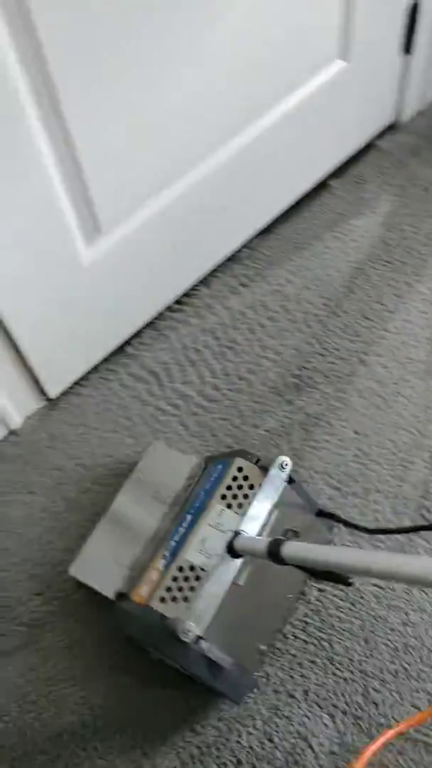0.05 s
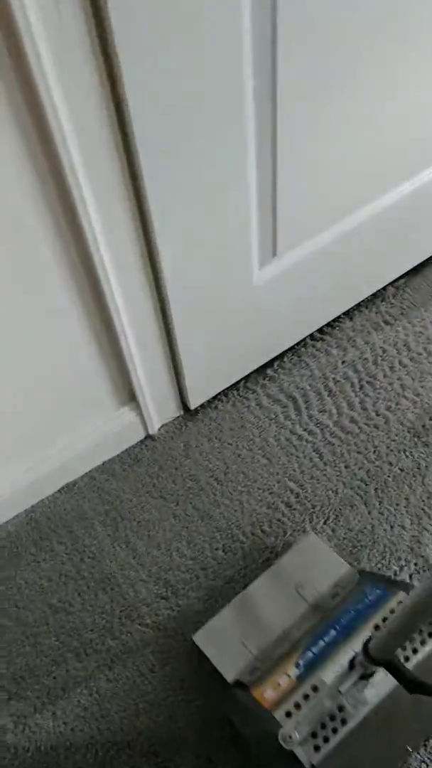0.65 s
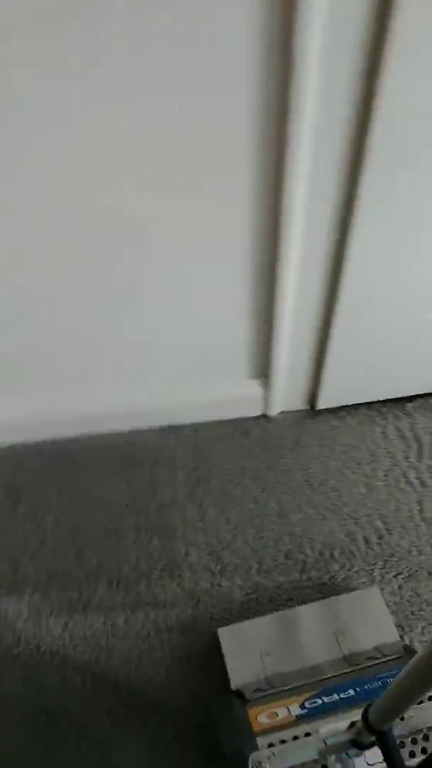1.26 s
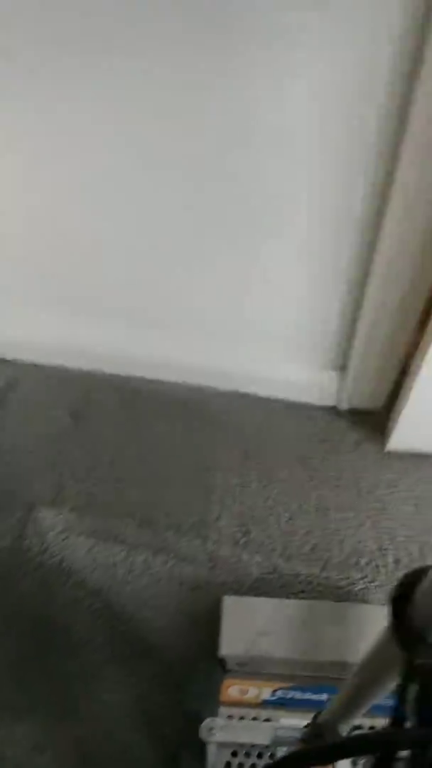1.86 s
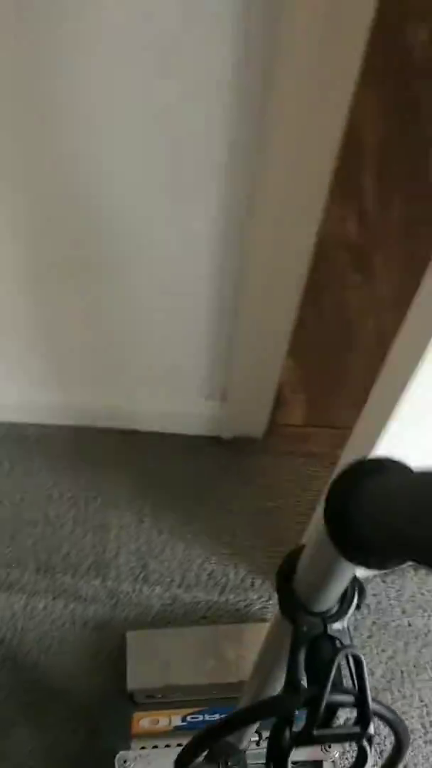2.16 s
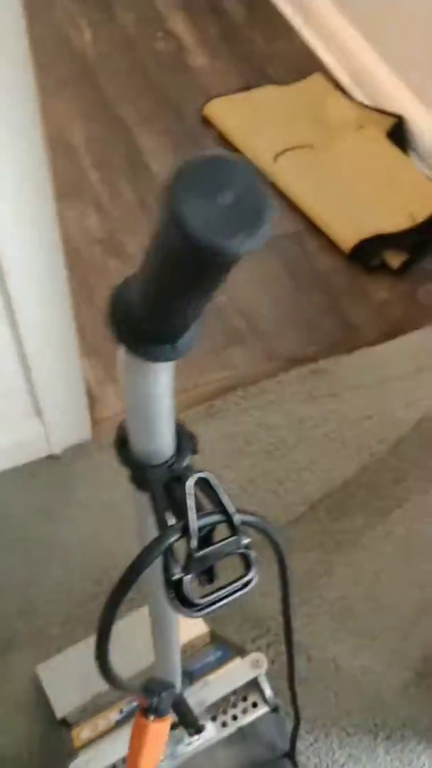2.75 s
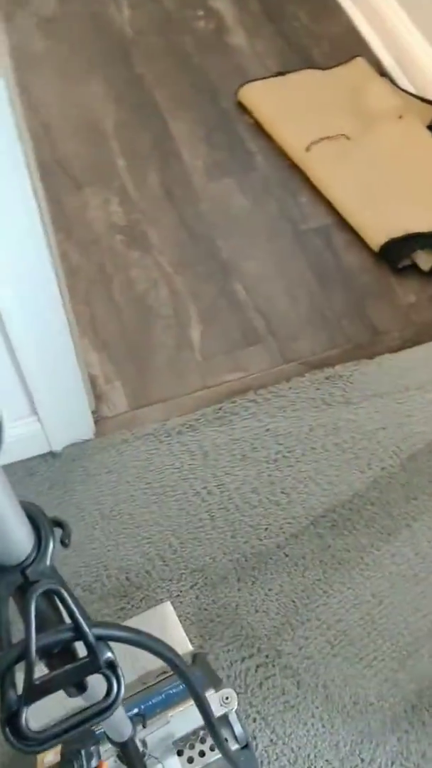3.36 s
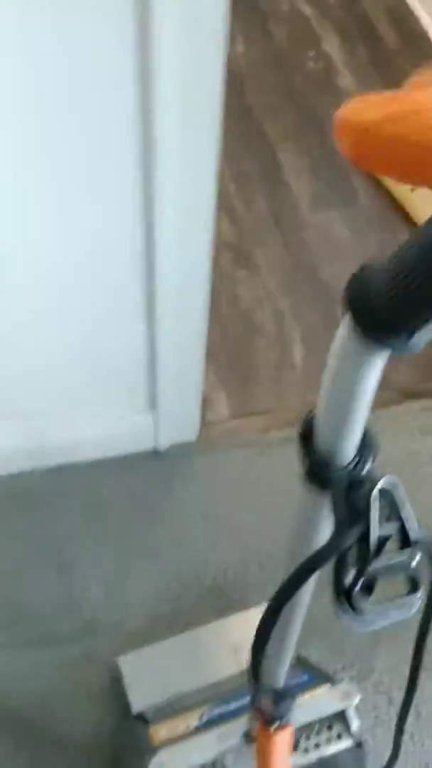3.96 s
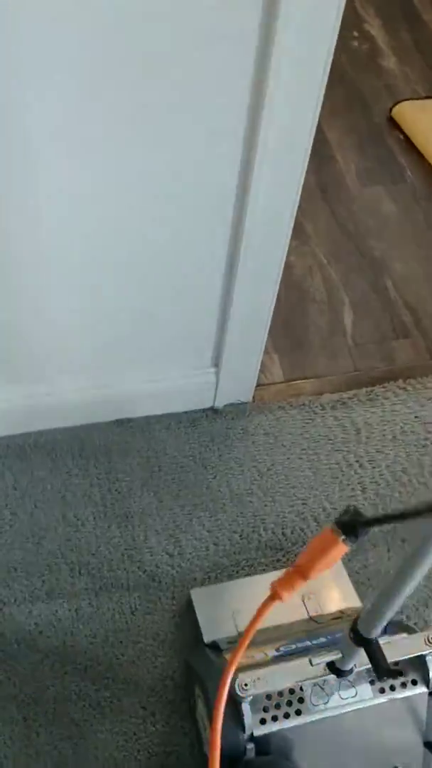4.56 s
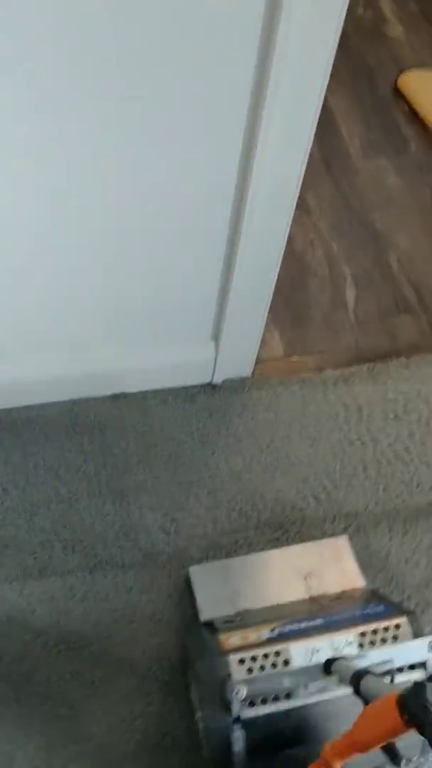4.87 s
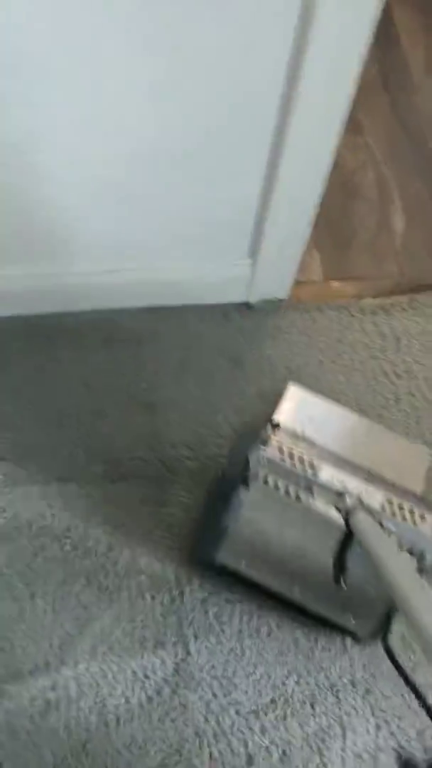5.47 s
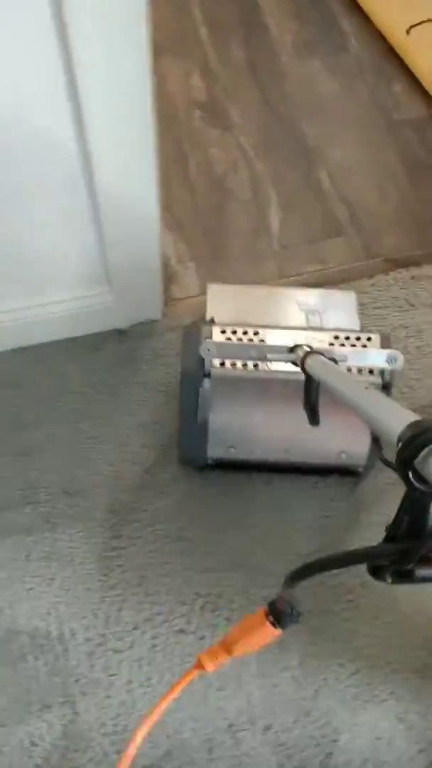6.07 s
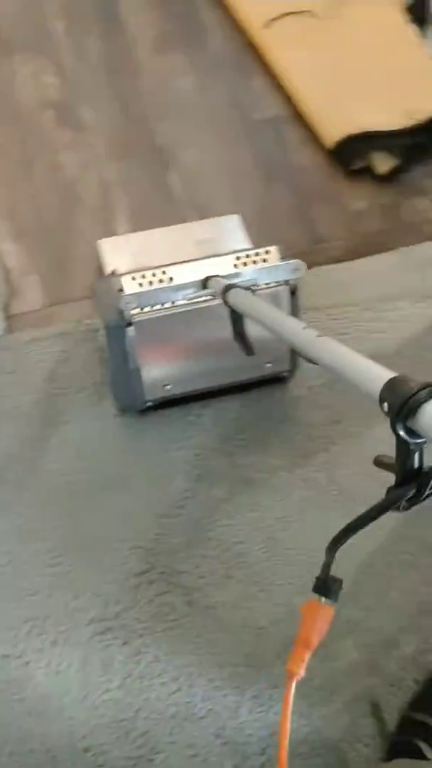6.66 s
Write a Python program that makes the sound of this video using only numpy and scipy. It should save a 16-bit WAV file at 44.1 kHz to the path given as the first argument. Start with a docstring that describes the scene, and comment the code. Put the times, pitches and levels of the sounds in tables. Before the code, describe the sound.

A carpet brush machine runs loudly, with a rattling motor drone and hissing bristles. Within a second it switches off and its handle latches upright with a metallic ring. It rolls softly over carpet, with faint wheel squeaks, light knocks and a clinking cord hook. A hand bumps the close microphone, a catch snaps open, and the motor spins up again in the quiet hallway.

```python
"""A carpet brush machine runs in a hallway: gear impacts and flicking bristles excite its metal housing.
It is switched off, friction stops the brushes, and the handle latches upright with a ring.
It is wheeled softly over the pile; a wheel squeaks, the handle tube knocks and the cord hook clinks.
Cord and glove rub the handle, a hand brushes the pair of microphones, and the catch snaps open.
Last, the switch clicks and the motor spins up again. A faint room tone lies under it all."""
import sys
import numpy as np
from scipy import signal
from scipy.fft import rfft, irfft, next_fast_len
from scipy.io import wavfile

SR = 44100
rng = np.random.default_rng(int(sys.argv[2]) if len(sys.argv) > 2 else 0)


def wav_record(signal):
    """Record a signal, one row per channel, as 16-bit PCM in the file named by sys.argv[1]."""
    frames = np.transpose(np.atleast_2d(signal))
    bounded = np.clip(frames, -1, 1)
    # unit amplitude maps onto the largest positive 16-bit level
    quanta = np.round(bounded * 32767).astype(np.int16)
    wavfile.write(sys.argv[1], SR, quanta)


N = 296352
TIME = np.arange(N) / SR
FFT_SIZE = next_fast_len(N + SR // 2)
HZ = np.maximum(np.arange(FFT_SIZE // 2 + 1) * SR / FFT_SIZE, 1)


def motor(shaft_hz=40.25, teeth=13, wander=.004, sag_per_db=.012, sag_below_db=-27):
    """Rotating machinery: one shaft times gears, bristles and drone, and turns slower at weak drive."""
    gear_db, bristle_db = run_levels()
    speed = 1 - sag_per_db * np.clip(sag_below_db - gear_db, 0, 40) + wander * drift(14)
    turns = np.cumsum(shaft_hz * speed) / SR
    rattle = gear_rattle(teeth * turns)
    hiss = bristle_hiss(turns / shaft_hz)
    tones = winding_hum() + shaft_drone(turns, teeth)
    return from_db(gear_db) * (rattle + tones) + from_db(bristle_db) * hiss


# motor runs: on t/s, off t/s, gear base level/dB, bristle base level/dB
RUNS = [(-0.2, 0.73, -21, -31), (5.111, 7.0, -22, -33)]
def run_levels(bite_db=3, bite_s=.09, swell_db_per_s=3, spin_up_s=.11, hiss_exponent=1.7):
    """Noise follows load: the brushes grab the pile, settle, then dig in. Gear and bristle levels in dB."""
    gears = bristles = 1e-6
    for on_s, off_s, gear_db, bristle_db in RUNS:
        effort = drive(on_s, off_s, spin_up_s)
        running_s = np.clip(TIME, on_s, off_s) - on_s
        surge_db = bite_db * np.exp(-np.maximum(0, running_s - spin_up_s) / bite_s)
        swell_db = swell_db_per_s * running_s
        gears = gears + effort * from_db(gear_db + surge_db + swell_db)
        bristles = bristles + effort ** hiss_exponent * from_db(bristle_db + swell_db)
    return 20 * np.log10([gears, bristles])


def drive(on_s, off_s, spin_up_s, brake_s=.05, coast_s=.19, coast_share=.36):
    """Inertia and friction: the brushes spin up, hold, are braked by the pile and coast out (0-1)."""
    since_off = np.maximum(0, TIME - off_s)
    rising = np.clip((TIME - on_s) / spin_up_s, 0, 1) ** 1.8
    braking = (1 - coast_share) * np.exp(-since_off / brake_s)
    coasting = coast_share * np.exp(-since_off / coast_s)
    return rising * (braking + coasting)


# gear noise spectrum: f/Hz, level/dB
RATTLE_SPECTRUM = [(30, -28), (80, -14.5), (170, -10.5), (235, -7.5), (290, -1), (500, -0.5), (650, -1),
                   (850, 0), (1100, -1), (1600, -0.5), (1900, -4.5), (2250, -23), (3500, -14.5),
                   (5000, -23.5), (9000, -25.5)]
def gear_rattle(teeth_passed, tooth_gain=.36, level_db=-3):
    """Impact excitation: each meshing tooth strikes with uneven force among random small contacts."""
    strikes = np.diff(np.floor(teeth_passed), prepend=0) * white()
    contacts = tooth_gain * unit_rms(strikes) + grains(per_s=4500, spread_db=.4)
    return from_db(level_db) * housing(coloured(contacts, RATTLE_SPECTRUM))


# bristle noise spectrum: f/Hz, level/dB
HISS_SPECTRUM = [(1200, -56), (2400, -3.5), (3300, 0.5), (3900, 3), (4250, -2.5), (5100, -4.5), (5900, -3),
                 (6400, -9.5), (8200, -9.5), (8900, -9), (10500, -11.5), (13000, -13.5), (16000, -17)]
def bristle_hiss(shaft_time_s, rows_hz=58, level_db=-.8):
    """Shot noise: countless flicks merge into a hiss, weakly modulated as each row meets the pile."""
    rows_db = .5 * np.sin(2 * np.pi * rows_hz * shaft_time_s) + .4 * drift(220)
    flicks = coloured(grains(per_s=22000, spread_db=1), HISS_SPECTRUM)
    return from_db(level_db + rows_db) * housing(flicks)


# the machine's four places (by the door, at the wall, turning, in the doorway): t/s
PLACE_TIMES = [1.0, 5.45, 5.9, 6.45]
# housing modes: f/Hz, bandwidth/Hz, level/dB at each place
HOUSING_MODES = [(272, 21, 4.5, -1, 8, 1), (334.6, 25, 4.5, 7.5, 6, 2), (448, 25, 6.5, -2, 11, 0.5),
                 (496, 15, 8, 4, 11, -6), (561.5, 22, 6, 3, 10, 1), (735, 51, 0.5, 5.5, 7.5, 5),
                 (790, 21, 2.5, 4, 8, 9), (858, 27, 6, 1, 1, 1), (941, 67, 5, 2, 7, 7),
                 (1066, 57, -3.5, -3, 11.5, -2), (1330, 99, 2, -6, 7, 4.5), (1520, 230, -2, 2.5, -2, 2),
                 (2010, 150, 1, 4, 7.5, -4), (2620, 240, 4, 4.5, 11, 4.5), (3836, 130, 1.5, 1, 11.5, -10)]
def housing(x, ripple_db=2.5, ripple_hz=19):
    """Resonance and interference: modes lift the spectrum and near walls ripple it, place by place."""
    out = 0
    for k, here in enumerate(np.eye(len(PLACE_TIMES))):
        lift_db = sum(db[k] * resonance(hz, width) for hz, width, *db in HOUSING_MODES)
        ripple = np.interp(HZ / ripple_hz, np.arange(2000), rng.standard_normal(2000))
        crossfade = np.sqrt(np.interp(TIME, PLACE_TIMES, here))
        out = out + crossfade * unit_rms(filtered(x, from_db(lift_db + ripple_db * ripple)))
    return out


# shaft harmonics: multiple of the turning rate, relative level/dB at each place
SHAFT_ORDERS = [(7, -24, -24, -22, -17), (8, -25, -18, -17, -22), (11, -19, -23, -15, -17),
                (13, -13, -6.5, -5, -10.5), (14, -11, -18, -17, -16), (19, -23, -16, -17, -12),
                (20, -17, -15, -19, -15), (23, -15, -26, -25, -24), (32, -22, -23, -21, -17),
                (34, -20, -19, -18, -17)]
def shaft_drone(turns, teeth, flutter_db=3.2):
    """Harmonics of rotation: the lines churn with the load; the tooth rate is steadiest in phase."""
    out = 0
    for order, *db in SHAFT_ORDERS:
        level_db = np.interp(TIME, PLACE_TIMES, db) + flutter_db * drift(20)
        slip_rad = (.45 if order == teeth else .9) * drift(32)
        out = out + from_db(level_db) * np.sin(2 * np.pi * order * turns + slip_rad)
    return out


# hum of the windings: relative level/dB at each place
WINDING_LEVELS = [-21.5, -27.5, -28, -28]
def winding_hum(mains_hz=59.8):
    """Magnetic force peaks twice a cycle, so the windings hum at double the mains frequency."""
    tone = np.sin(4 * np.pi * mains_hz * TIME + .35 * drift(40))
    level_db = np.interp(TIME, PLACE_TIMES, WINDING_LEVELS) + 2.2 * drift(35)
    return from_db(level_db) * tone


# knocks on the handle tube: t/s, level/dB, tilt/(dB/octave), T60/s, spot f/Hz, spot level/dB
KNOCKS = [(0.913, -44, -7, 0.12, 800, -37), (1.309, -45, -9, 0.02, 1100, -45),
          (1.678, -47, 0, 0.08, 3450, -40), (1.724, -38.5, -3.5, 0.095, 1600, -39),
          (1.77, -40, -1.8, 0.12, 3300, -39), (2.853, -30, -1, 0.16, 800, -33),
          (2.966, -43, -6, 0.15, 1050, -35), (3.997, -44, -5, 0.04, 1340, -32),
          (4.041, -41, -4, .05, 1420, -29), (4.155, -42, -10.5, 0.08, 600, -27),
          (4.297, -33, -7, 0.05, 445, -23), (4.322, -47, -9, 0.05, 1320, -33),
          (4.473, -40, -0.5, 0.05, 3300, -33), (4.848, -22.5, -2, 0.03, 1550, -15.5),
          (4.94, -32.5, 2.5, 0.06, 1300, -30), (5.135, -31, -3, 0.05, 800, -29)]
# clicks of switch, latch and fittings: t/s, level/dB, tilt/(dB/octave), T60/s
CLICKS = [(0.721, -43, 5.5, 0.092), (0.999, -37.5, -4, 0.06), (1.016, -29.5, 7, 0.017),
          (1.022, -29.5, 4.5, 0.055), (2.72, -46, -3.5, 0.11), (3.05, -51, -2.5, 0.21),
          (3.475, -51, -3, 0.3), (3.979, -40, -1.5, 0.056), (4.053, -42.5, -3, 0.02),
          (4.484, -41, -3, 0.03), (4.503, -41, 0, 0.084), (4.758, -43.5, 4, 0.11), (4.951, -33, -2, 0.036),
          (5.113, -37.5, 0, 0.13)]
# thud, clack, snap and tick bands: lower f/Hz, upper f/Hz
IMPACT_BANDS = [(250, 650), (750, 1950), (2000, 6000), (6000, 15000)]
# response of each band: knock gain/dB, click gain/dB, factor on T60
BAND_RESPONSE = [(-10, -1, 0.64), (4, 2, 0.94), (3, 1.5, 1.21), (-4.5, 2.5, 1.12)]
def impacts(pivot_hz=2000):
    """Modal overlap: a blow excites modes of plastic and tube so dense that they decay as noise bands."""
    out = 0
    for (low, high), (knock_db, click_db, t60_factor) in zip(IMPACT_BANDS, BAND_RESPONSE):
        octaves = np.log2(np.sqrt(low * high) / pivot_hz)
        envelope = 0
        for rows, band_db in (KNOCKS, knock_db), (CLICKS, click_db):
            s, db, tilt, t60 = with_rebounds(rows)
            envelope = np.hypot(envelope, blows(s, db + band_db + tilt * octaves, t60 * t60_factor))
        band = signal.butter(4, [low, high], "band", fs=SR, output="sos")
        chatter = grains(per_s=14000, spread_db=1.5) * envelope
        out = out + signal.sosfilt(band, chatter) * np.sqrt(SR / 2 / (high - low))
    return out


def struck_spots(t60_s=.12):
    """Local resonance: each knock sounds the hollow note of the spot that it strikes."""
    return sum(ringing([(hz, 0, t60_s)], [(s, db)], split=.03) for s, *_, hz, db in KNOCKS)


def softness_db(db, hard_blow_db=-30.5):
    """Nonlinear contact: crack and rebound weaken by as much as a blow falls short of a hard one."""
    return max(0, hard_blow_db - db)


def with_rebounds(rows, delay_s=.0092, loss_db=4.5):
    """Restitution: each blow makes a second, weaker contact. Returns the columns of both."""
    first = [row[:4] for row in rows]
    again = [(s + delay_s, db - loss_db - softness_db(db), tilt, t60) for s, db, tilt, t60 in first]
    return np.transpose(first + again)


def blows(times, levels_db, t60s, rise_s=.0005, crack_t60_s=.0059):
    """Incoherent sum: the opening cracks and decaying chatter of blows add in power to one envelope."""
    power = np.zeros(N)
    for s, db, t60 in zip(times, levels_db, t60s):
        start = int(s * SR)
        age = TIME[:min(SR // 2, N - start)]
        chatter = from_db(db - 60 * age / t60) ** 2 * (1 - np.exp(-age / rise_s))
        crack = from_db(db - softness_db(db) - 60 * age / crack_t60_s) ** 2
        power[start:start + len(age)] += chatter + crack
    return np.sqrt(power)


# modes of the handle tube and its fittings: f/Hz, bandwidth/Hz, added gain
TUBE_MODES = [(470, 45, 0.48), (1134, 60, 0.65), (1480, 87, 0.28)]
def tube(x):
    """Forced resonance: the hollow tube adds its short-lived modes to every impact."""
    peaks = sum(gain * signal.lfilter(*signal.iirpeak(hz, hz / width, fs=SR), x)
                for hz, width, gain in TUBE_MODES)
    return x + peaks


# modes of latch, metal cord hook and catch: f/Hz, level/dB, T60/s
LATCH_MODES, HOOK_MODES, CATCH_MODES = [(479, -27, .5), (1186, -18, .22), (1235, -1.5, .048),
                                        (1265, -13.5, .46), (1334, -25, .38), (3171, -35, .43),
                                        (3327, -33, .3), (4270, -8, .06), (5190, -23, .28),
                                        (6250, -10, .06), (6761, -25, .22), (7585, -27, .28)], [(540, -12, .09), (760, -14, .1), (1120, -8, .08),
                                                       (1450, -11, .2), (1950, -6, .08), (2762, -21, .45),
                                                       (2853, -25, .6), (3060, -11, .1), (4150, -11, .08),
                                                       (4700, -23, .35), (5001, -22, .65), (5200, -20, .3),
                                                       (5335, -15.5, .42), (5420, -24, .8),
                                                       (9520, -2, .075), (9470, -21, .4), (9590, -20, .45),
                                                       (14100, -13, .1), (14080, -30, .3)], [(1087, -5, .07), (1260, -5, .09),
                                                                     (1750, -2, .04), (3112, -9, .06),
                                                                     (9350, -12, .06), (9450, -19, .3),
                                                                     (9800, -18, .06)]
# blows on each: t/s, level/dB
LATCH_HITS, HOOK_HITS, CATCH_HITS = [(1.022, -10), (1.032, -24.5)], [(2.857, -18.5)], [(4.848, -18), (4.857, -19),
                                                                            (4.946, -27.5)]
def clanks():
    """Free vibration: the latch drops home, the hook hits the tube, the catch snaps open; each rings."""
    latch = ringing(LATCH_MODES, LATCH_HITS, split=.002)
    hook = ringing(HOOK_MODES, HOOK_HITS, split=.004)
    catch = ringing(CATCH_MODES, CATCH_HITS, split=.008)
    return latch + hook + catch


def ringing(modes, hits, split):
    """Beating: each damped mode is a cluster of four close tones that start in phase and drift apart."""
    out, age = np.zeros((2, N)), TIME[:SR // 2]
    for s, blow_db in hits:
        start = int(s * SR)
        for hz, db, t60 in modes:
            tones_hz = hz * (1 + split * rng.uniform(-1, 1, size=(2, 4, 1)))
            cluster = np.sin(2 * np.pi * (tones_hz * age + rng.random((2, 1, 1)))).mean(axis=1)
            out[:, start:start + len(age)] += cluster * from_db(blow_db + db - 60 * age / t60)
    return out


# rolling noise, louder at speed: t/s, level/dB
ROLL_LEVELS = [(1.36, -61), (1.5, -48), (1.85, -44.5), (2.22, -42.5), (2.85, -36.5), (3.1, -39),
               (3.88, -41), (4.14, -39), (5.05, -42.5)]
# spectrum of the crushed pile: f/Hz, level/dB
PILE_SPECTRUM = [(30, -16), (70, -10), (95, -9), (150, -2), (225, -2.5), (285, 1.5), (380, -1.5), (500, -3),
                 (900, -5), (1450, -4), (1850, -9), (2250, -21), (3500, -20), (6000, -27), (10000, -31),
                 (15000, -36)]
def wheels(gain_db=.5):
    """Rolling noise: the wheels crush the pile in many soft, random contacts."""
    times, levels_db = np.transpose(ROLL_LEVELS)
    crush = coloured(grains(per_s=9000, spread_db=2), PILE_SPECTRUM)
    level_db = np.interp(TIME, times, levels_db) + gain_db + .6 * drift(45)
    return crush * from_db(level_db) * during(times[0], times[-1], fade_s=.08)


# squeaks of a wheel and the handle joint: centre t/s, level/dB, half-width/s, f/Hz, glide/(Hz/s)
SQUEAKS = [(1.935, -43, 0.019, 973, 700), (2.024, -41.5, 0.03, 1035, 150), (4.708, -30, 0.0061, 3230, 2030)]
def squeaks(jitter=.014, dull_hz=2600):
    """Stick-slip oscillation: dry joints give rising, wavering tones with weak upper harmonics."""
    out = 0
    for s, db, half_s, hz, glide in SQUEAKS:
        pitch_hz = hz + glide * np.clip(TIME - s, -2 * half_s, 2 * half_s)
        phase = 2 * np.pi * np.cumsum(pitch_hz * (1 + jitter * drift(200))) / SR
        tone = sum(np.sin(k * phase) / k / np.hypot(1, (k * hz / dull_hz) ** 2) for k in range(1, 5))
        out = out + tone * swells([(s, db, half_s)])
    return out


# strokes on the handle: centre t/s, level/dB, half-width/s
RUBS = [(4.135, -46, 0.018), (4.2, -46.5, 0.069), (4.5, -51, 0.15), (4.71, -44, 0.03), (4.9, -40.5, 0.071),
        (5.05, -48.5, 0.13)]
# their spectrum: f/Hz, level/dB
SCRAPE_SPECTRUM = [(1000, 6.5), (1600, 5.5), (2200, -7), (3300, 3), (6000, -2.5), (10000, -0.5),
                   (15500, -15)]
def rubbing():
    """Friction noise: cord and glove scrape the tube in fine crackles."""
    scrape = coloured(grains(per_s=3800, spread_db=.5), SCRAPE_SPECTRUM) * from_db(2.4 * drift(57))
    return scrape * swells(RUBS)


# one swish and two whistles: centre t/s, level/dB, half-width/s
SWISH, WHISTLES = [(1.62, -49, 0.11)], [(1.62, -54, 0.094), (1.83, -54, 0.066)]
# spectrum of the swish: f/Hz, level/dB
SWISH_SPECTRUM = [(2500, -10), (3500, 1.5), (5200, -4), (6000, -5), (8000, -3), (10000, -11), (15500, -4.5)]
def swish():
    """Broadband and narrowband noise: a soft, airy swish with two faint high whistles."""
    whistle = unit_rms(filtered(white(), resonance(hz=4800, width_hz=600)))
    return coloured(white(), SWISH_SPECTRUM) * swells(SWISH) + whistle * swells(WHISTLES)


# touches of the hand: centre t/s, level/dB, half-width/s
TOUCHES = [(3.62, -41, 0.04), (4.2, -43, 0.5), (4.146, -27, 0.0068), (4.174, -24, 0.009),
           (4.873, -34, 0.011)]
# their rumble: f/Hz, level/dB
RUMBLE_SPECTRUM = [(25, -10), (60, -4), (120, 5), (200, -4), (400, -23), (2000, -60)]
def handling_rumble(left_db=-4):
    """Structure-borne sound: the hand pushes the two microphones in antiphase, the right one harder."""
    push, stray = coloured(white(), RUMBLE_SPECTRUM) * swells(TOUCHES)
    return np.array([from_db(left_db) * (.5 * stray - push), push])


def hallway(x, wet_db=-6.5, dull_hz=10000, t60_s=.42):
    """Reverberation: diffuse reflections add a short decaying tail, duller than the direct sound."""
    age = TIME[:SR // 2]
    tail = rng.standard_normal((2, len(age))) * from_db(-60 * age / t60_s) * (age > .005)
    tail /= np.sqrt(np.sum(tail ** 2, axis=1, keepdims=True))
    return x + from_db(wet_db) * filtered(x, rfft(tail, FFT_SIZE) / np.hypot(1, HZ / dull_hz))


# spectrum of the still hallway: f/Hz, level/dB
ROOM_SPECTRUM = [(30, -14), (90, -7), (140, 0), (250, -2), (600, -4), (1500, -9), (2250, -27), (4000, -24),
                 (15000, -33)]
def room_tone(level_db=-54):
    """Stationary noise: a faint, dull floor of sound."""
    return from_db(level_db) * coloured(white(), ROOM_SPECTRUM)


# hum in the house: f/Hz, level/dB, end t/s
HOUSE_TONES = [(72, -61, 3.55), (120, -55, 7.0), (160, -60, 7.0)]
def house_hum():
    """Line spectrum: three faint, low tones, of which the deepest fades away midway."""
    return sum(from_db(db) * np.sin(2 * np.pi * hz * TIME) * during(0, end_s, fade_s=.15)
               for hz, db, end_s in HOUSE_TONES)


# microphone pair: f/Hz, correlation (0-1), left minus right level/dB
PAIR_RESPONSE = [(113, 0.95, 9), (259, 0.93, 0.5), (495, 0.7, -2), (930, 1, 0.5), (1640, 0.84, -4.5),
                 (2070, 0.99, 2), (2500, 1, -2), (4200, 0.78, -1.5), (6800, 0.56, -2), (10400, 0.7, -6),
                 (12400, 0.2, -5.5), (16000, .25, -5.5)]
# phase lead of the left microphone: f/Hz, phase/rad
LEFT_LEAD = [(40, -3), (90, -2), (125, -0.93), (266, -0.5), (530, 0.12), (1040, 0.53), (1412, -0.4),
             (1688, -1), (2100, -0.1857)]
def microphones(x, lag_s=.0005, lag_above_hz=1200):
    """Partial coherence: two microphones share part of the sound; the left hears the treble later."""
    hz, *columns = np.transpose(PAIR_RESPONSE)
    alike, pan_db = [np.interp(HZ, hz, column) for column in columns]
    alike = np.minimum(alike, .995)
    treble_lag_rad = 2 * np.pi * lag_s * np.maximum(0, HZ - lag_above_hz)
    lead_rad = np.interp(HZ, *np.transpose(LEFT_LEAD)) - treble_lag_rad
    shared, apart = rfft(x, FFT_SIZE) * np.sqrt([(1 + alike) / 2, (1 - alike) / 2])
    left = (shared + apart) * from_db(pan_db / 2) * np.exp(1j * lead_rad)
    right = (shared - apart) * from_db(-pan_db / 2)
    return irfft(np.array([left, right]), FFT_SIZE)[:, :N]


def from_db(db):
    """Level to amplitude ratio."""
    return 10 ** (np.asarray(db) / 20)


def unit_rms(x):
    """Normalisation to unit power."""
    return x / np.sqrt(np.mean(x ** 2) + 1e-20)


def white():
    """Two independent white noises: what the microphones share, and what differs between them."""
    return rng.standard_normal((2, N))


def grains(per_s, spread_db):
    """Poisson process: tiny clicks of uneven size, at unit power."""
    arrivals = rng.random((2, N)) < per_s / SR
    return unit_rms(arrivals * white() * from_db(spread_db * white()))


def drift(per_s):
    """Slow random modulation at unit power."""
    steps = rng.standard_normal(N // 40)
    return unit_rms(np.interp(TIME * per_s, np.arange(len(steps)), steps))


def during(start_s, end_s, fade_s):
    """A gate with exponential flanks."""
    outside_s = np.maximum(0, np.maximum(start_s - TIME, TIME - end_s))
    return np.exp(-outside_s / fade_s)


def swells(rows):
    """Gaussian envelopes: strokes that swell and fade evenly."""
    return sum(from_db(db) * np.exp(-.5 * ((TIME - s) / half_s) ** 2) for s, db, half_s in rows)


def resonance(hz, width_hz):
    """A resonance curve of unit height."""
    return 1 / (1 + (2 * (HZ - hz) / width_hz) ** 2)


def filtered(x, gain):
    """Linear filtering: one gain for each frequency."""
    return irfft(rfft(x, FFT_SIZE) * gain, FFT_SIZE)[..., :N]


def coloured(x, spectrum):
    """Spectral shaping to unit power, falling 12 dB an octave beyond the spectrum's ends."""
    hz, db = np.transpose(spectrum)
    skirts = np.minimum(1, HZ / hz[0]) ** 2 * np.minimum(1, hz[-1] / HZ) ** 2
    shape = from_db(np.interp(np.log(HZ), np.log(hz), db))
    return unit_rms(filtered(x, skirts * shape))


def scene():
    """Superposition: the machine, its handling and the quiet hallway add at the microphones."""
    hits = hallway(tube(impacts()) + struck_spots()) + clanks()
    airborne = room_tone() + motor() + wheels() + squeaks() + rubbing() + swish() + hits
    return microphones(airborne) + handling_rumble() + house_hum()


def record(dry, cutoff_hz=15850):
    """Band limiting: a steep low-pass removes the highest treble."""
    return filtered(dry, 1 / np.hypot(1, (HZ / cutoff_hz) ** 120))


dry = scene()
out = record(dry)
wav_record(out)
```